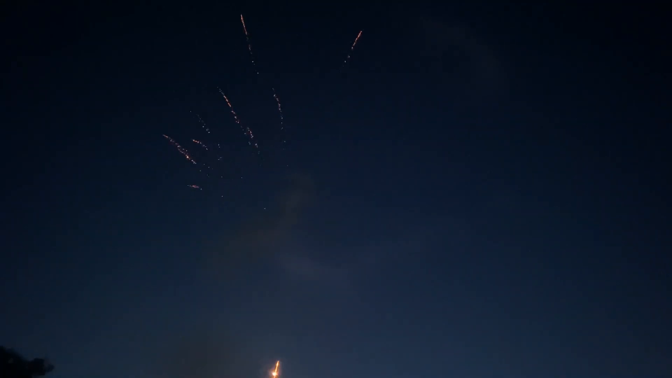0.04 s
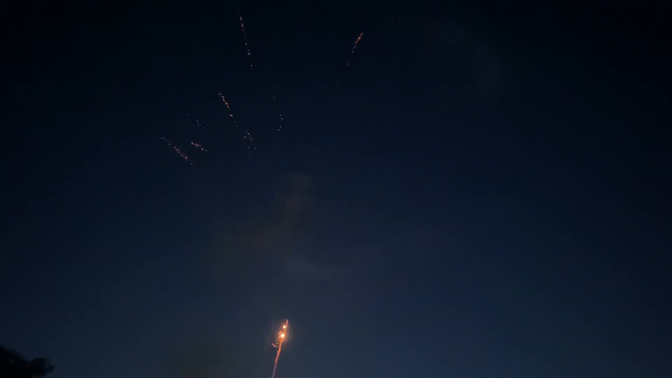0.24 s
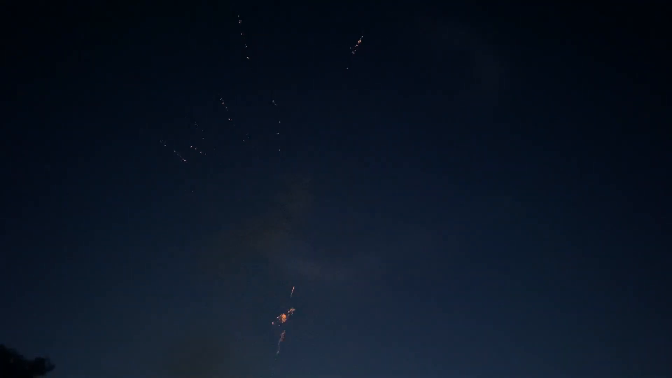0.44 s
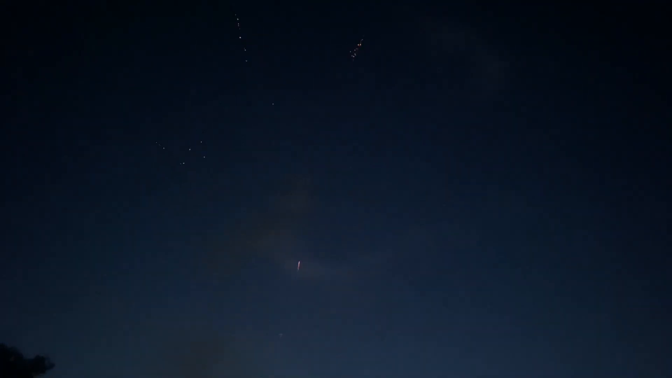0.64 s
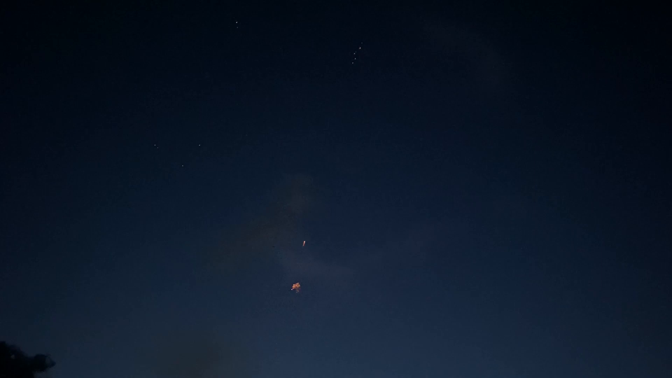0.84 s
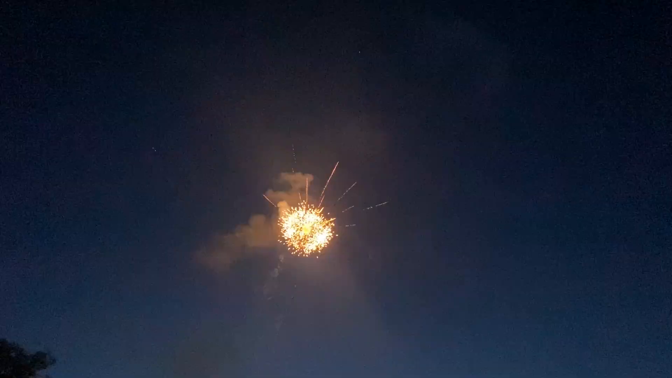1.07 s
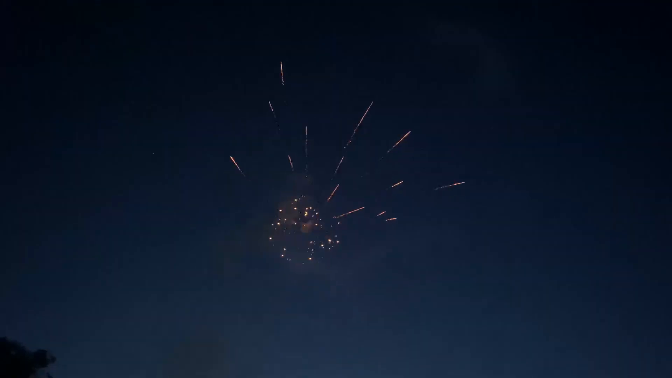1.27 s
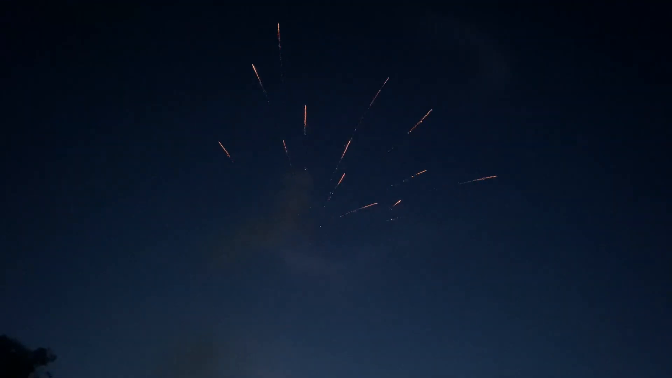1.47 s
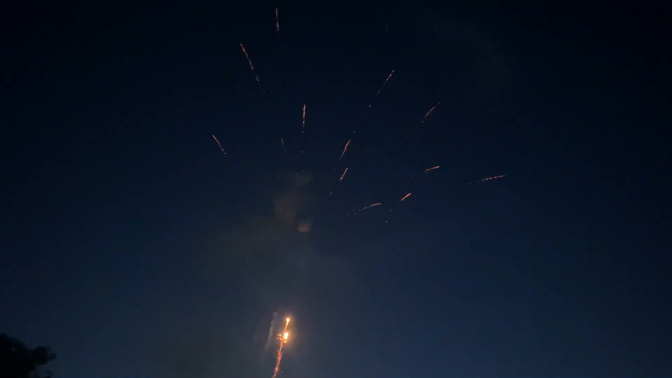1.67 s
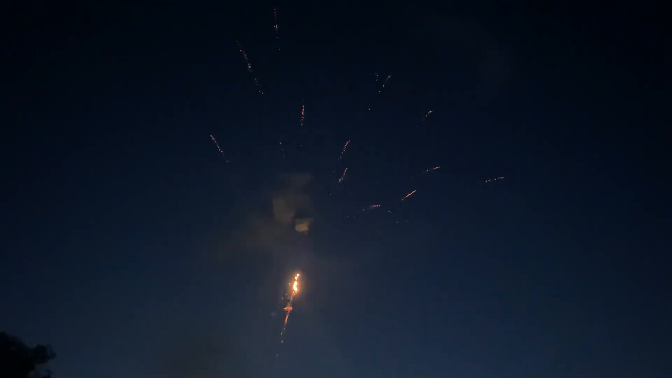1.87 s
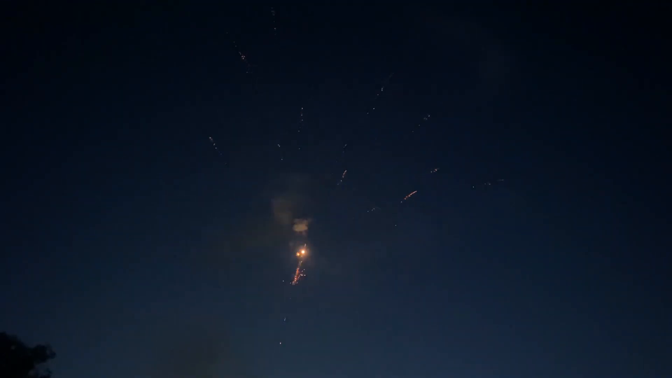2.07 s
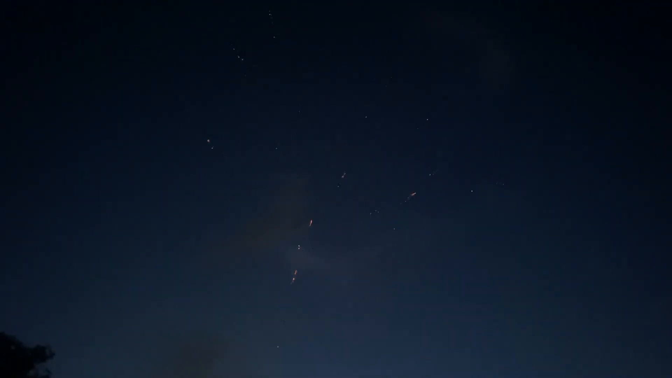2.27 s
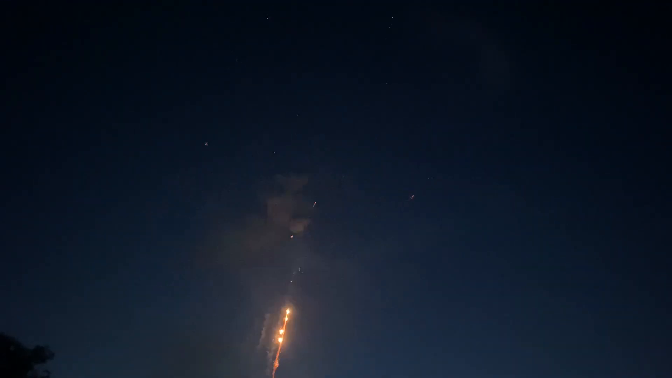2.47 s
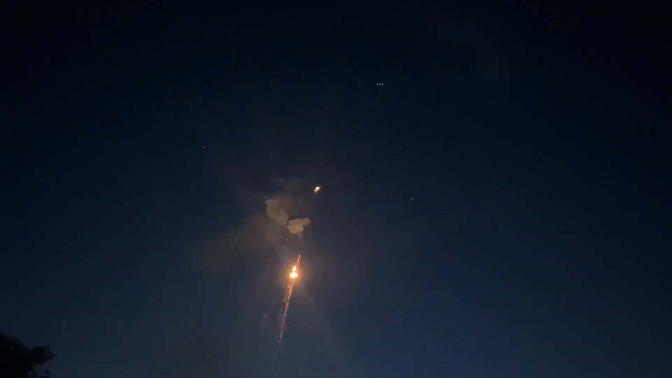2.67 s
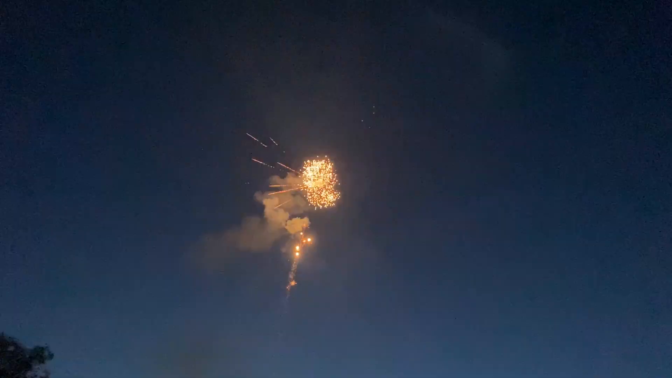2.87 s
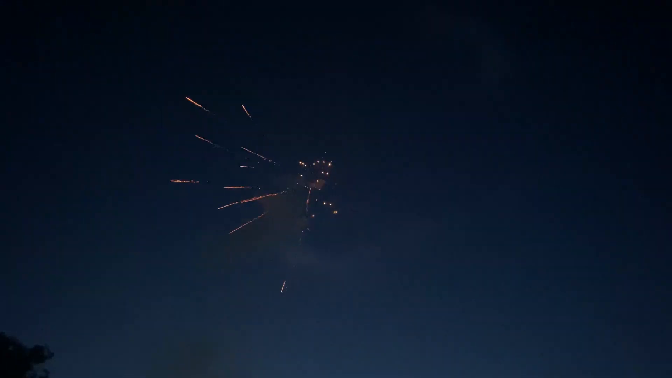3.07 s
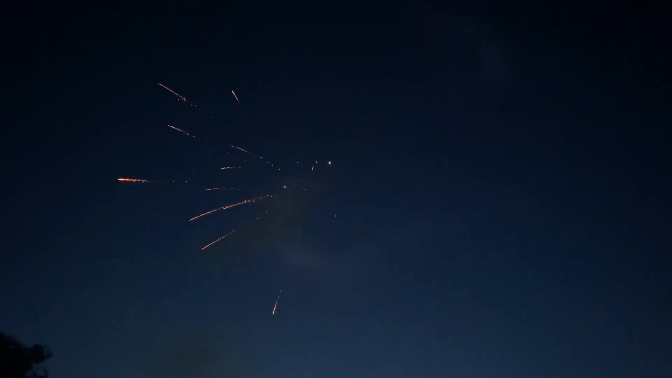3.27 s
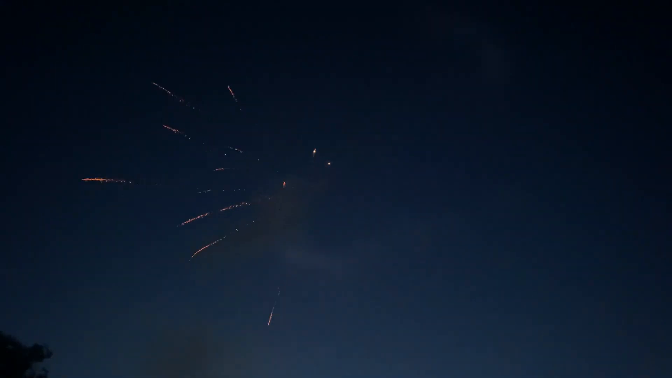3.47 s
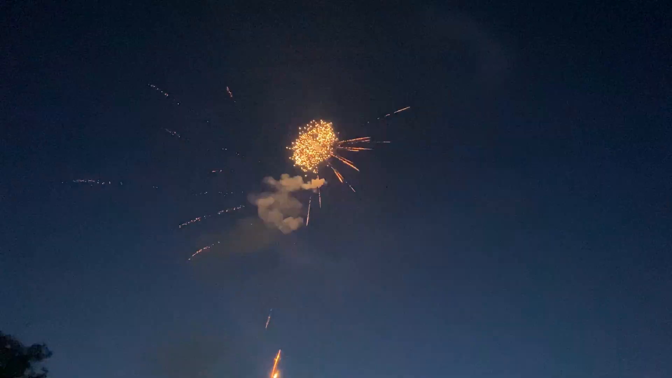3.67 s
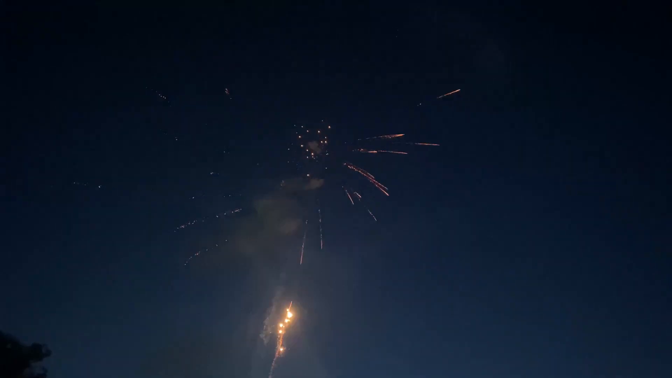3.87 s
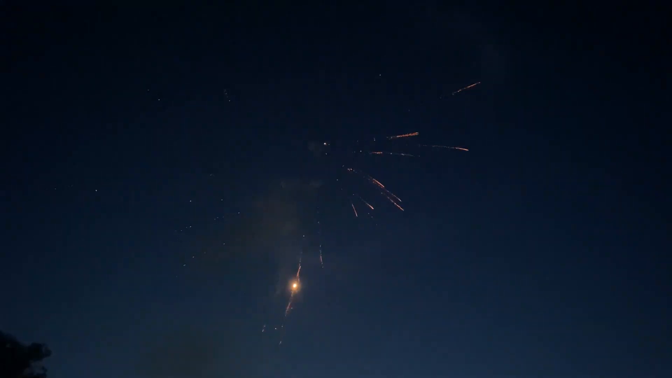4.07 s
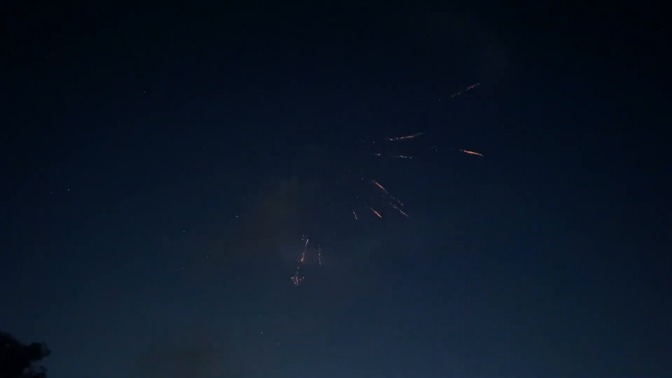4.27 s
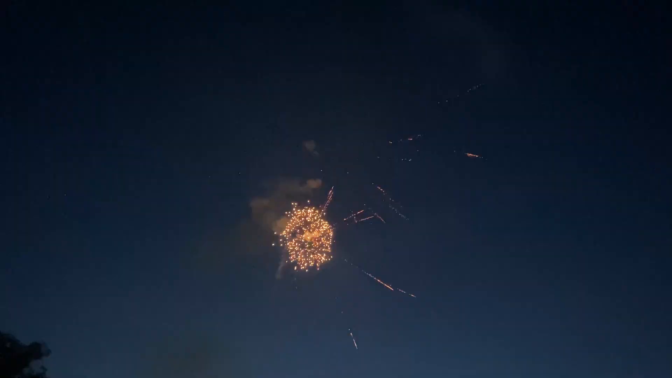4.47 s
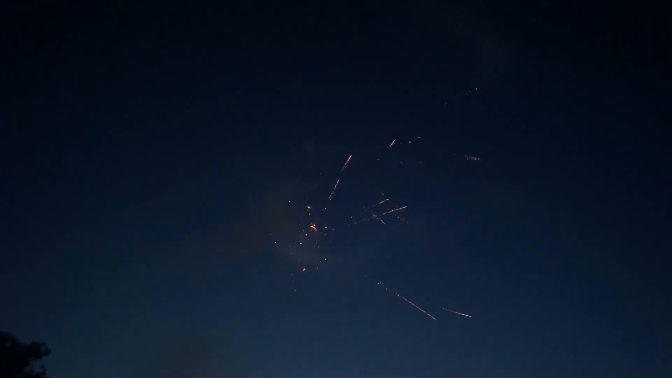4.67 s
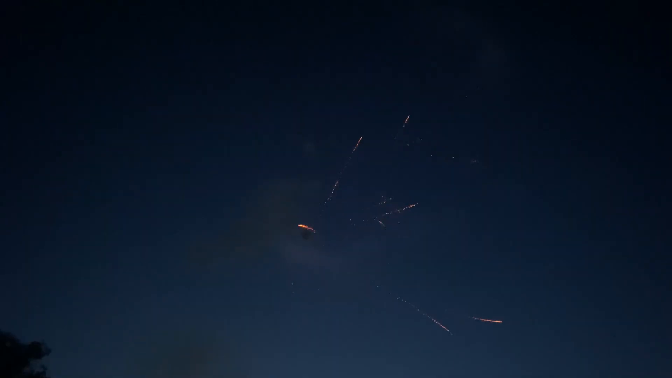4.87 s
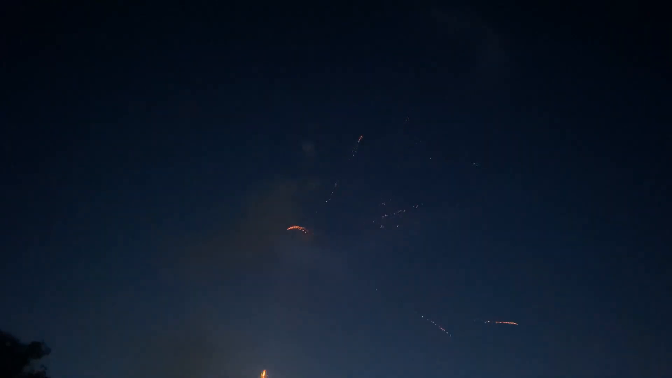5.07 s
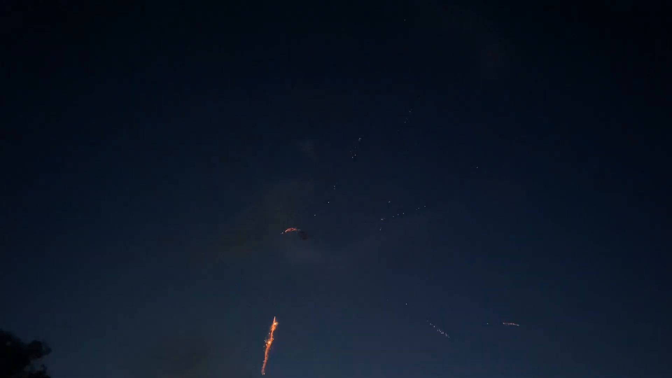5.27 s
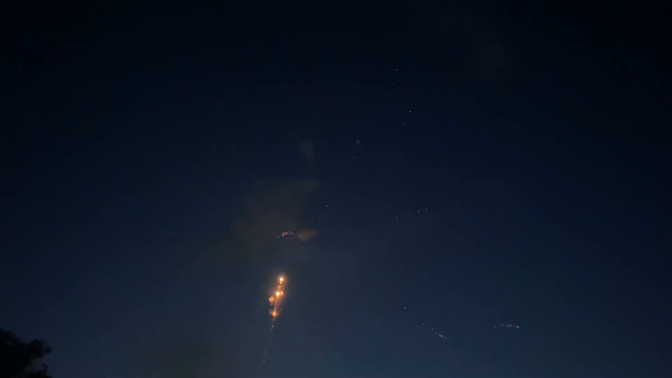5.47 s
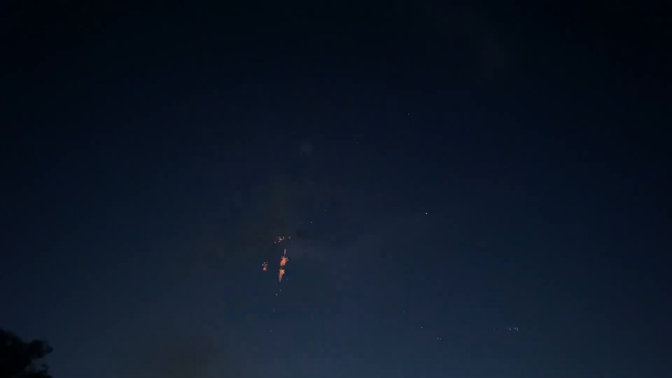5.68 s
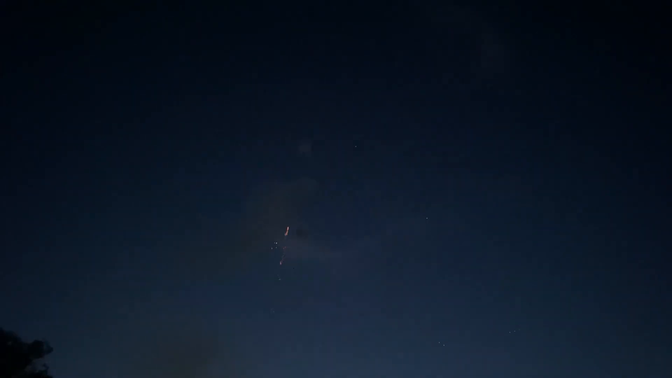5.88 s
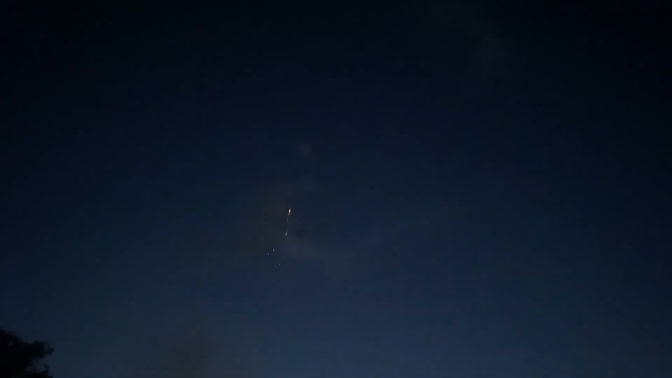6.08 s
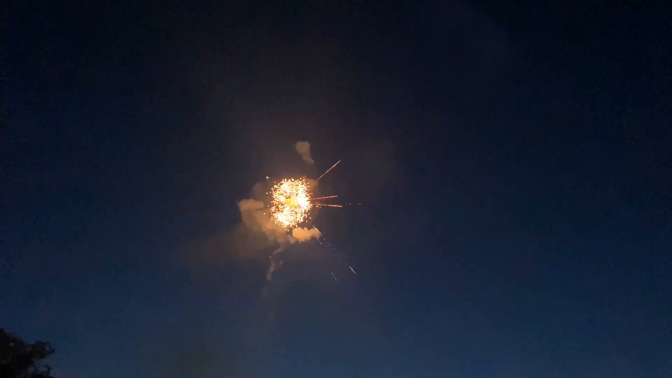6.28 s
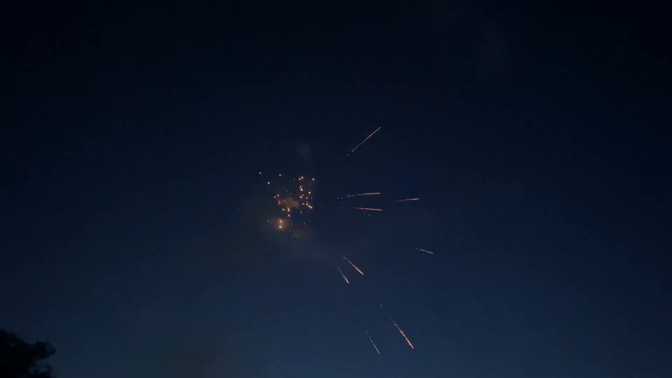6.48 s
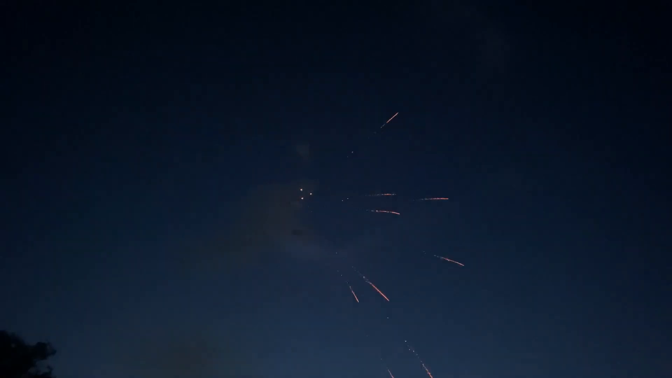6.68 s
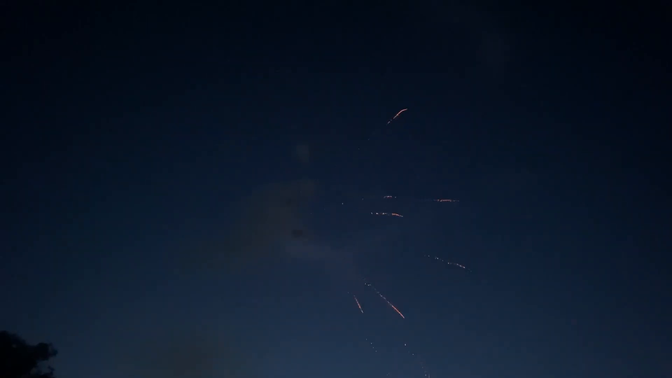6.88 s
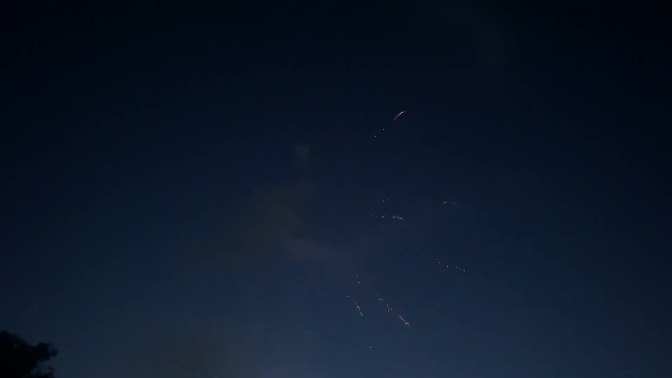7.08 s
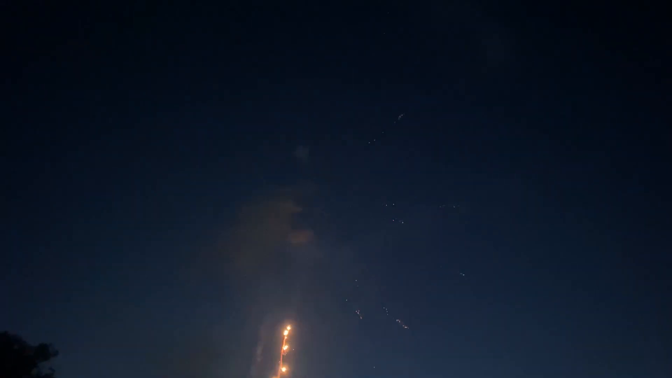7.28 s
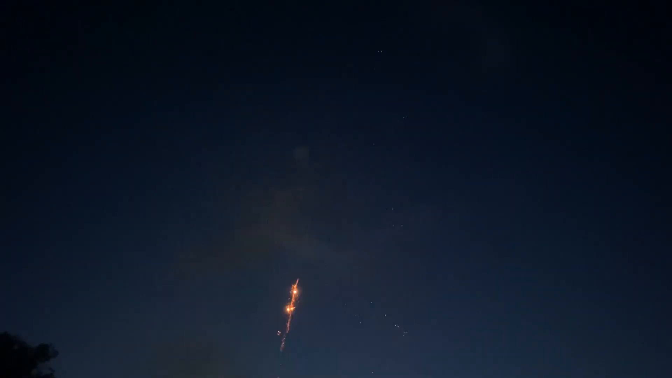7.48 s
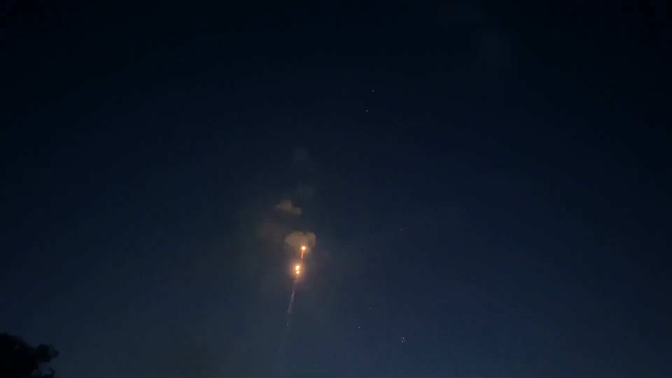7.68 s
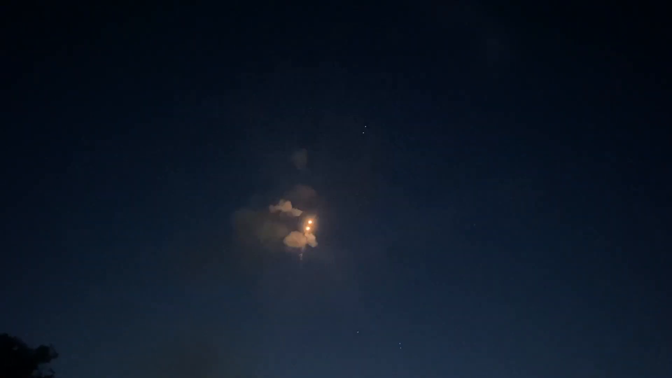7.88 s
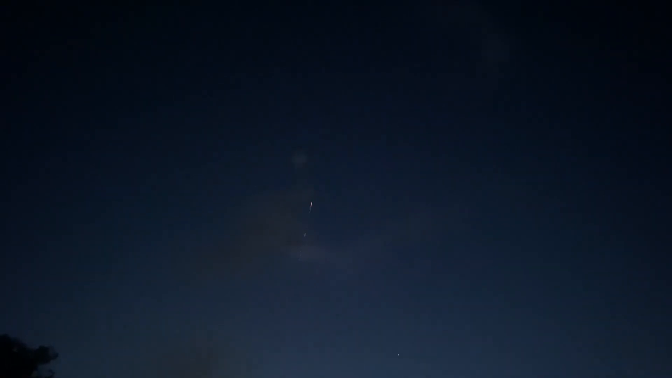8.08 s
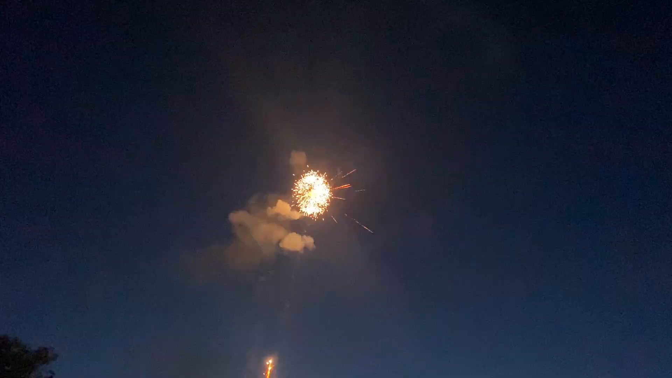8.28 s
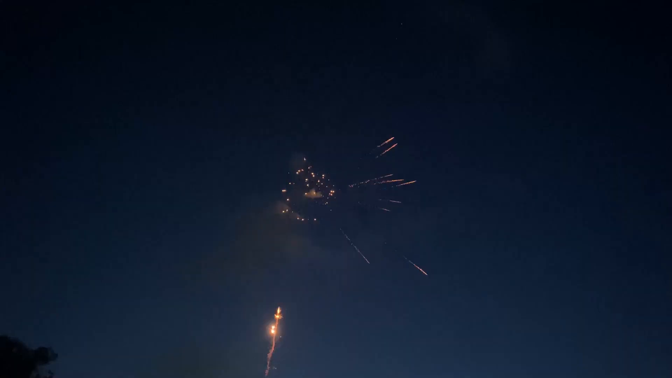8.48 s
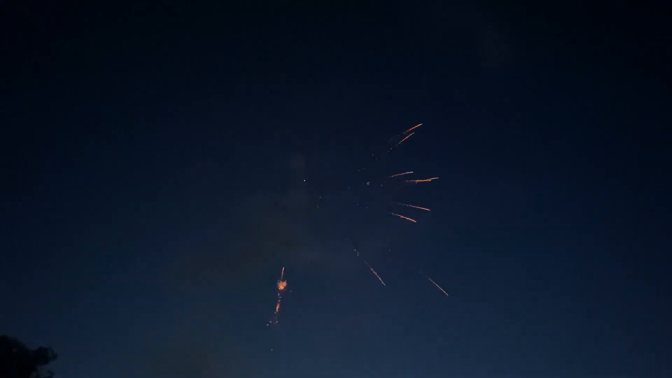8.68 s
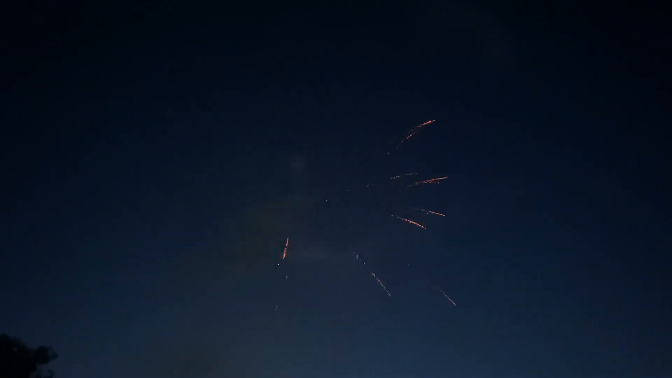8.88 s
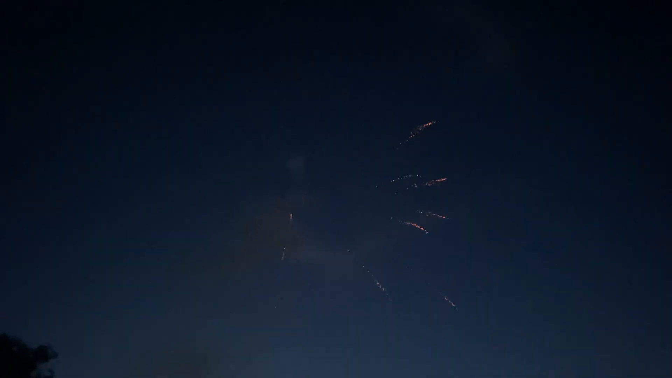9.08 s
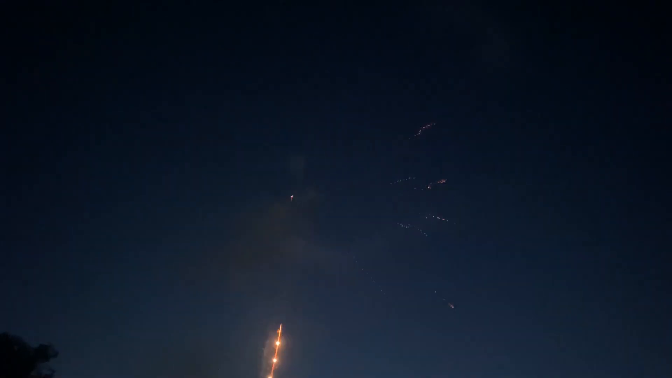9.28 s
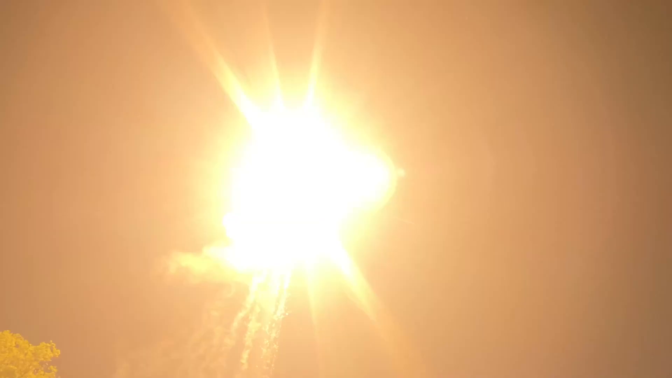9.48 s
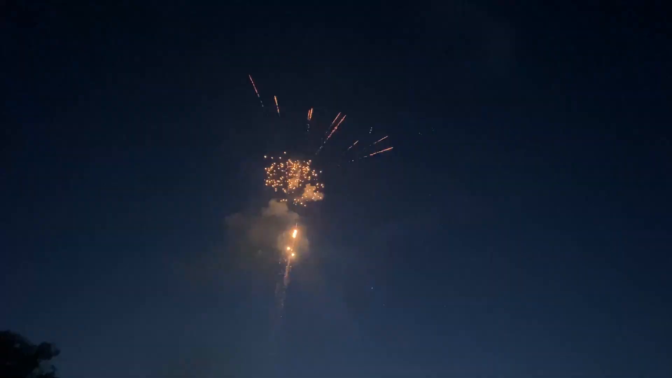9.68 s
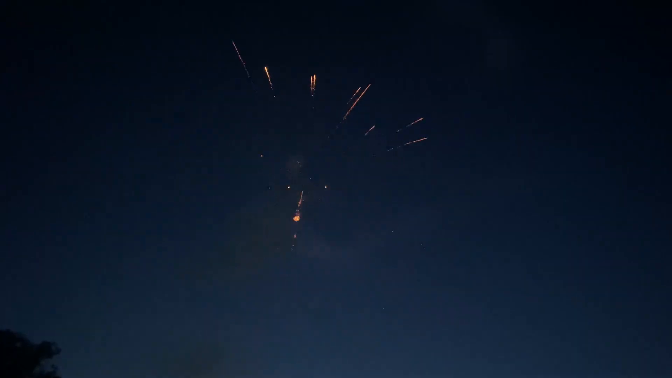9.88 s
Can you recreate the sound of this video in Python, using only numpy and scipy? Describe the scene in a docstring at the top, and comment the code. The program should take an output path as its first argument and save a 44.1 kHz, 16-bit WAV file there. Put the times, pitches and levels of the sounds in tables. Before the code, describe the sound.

A firework cake goes off in open ground at dusk, heard on a small stereo recorder. It opens on the fading rumble and crackle of an earlier shell, with scattered snaps to 1.1 s. A launch thump at 1.2 s is followed at once by a big, deep bang at 1.27. Crackle swells around 2.0 after another thump at 2.1, and again near 2.9. Heavy bursts come at 3.1, 3.9 and 4.6, with a thump at 3.3, crackle around 4.1 and faint thumps at 4.8 and 5.0. Bright crackle peaks near 5.4, and sparse snaps lead to a bang at 6.5. A thump at 6.9, crackle around 7.7, a weaker thump at 7.9 and thick snapping lead to the burst at 8.5. A thump at 8.9 and more crackle precede the last bang at 9.8. Each report has a fast ground slap and a wide, rumbling echo that fades into near silence.

```python
"""Open ground at dusk, a firework cake going off. Lift charges thump in the tubes, shells burst overhead
and clouds of stars crackle. Reports are N-shaped pressure waves with a noisy crack, doubled by the ground;
stars are clusters of filtered clicks. Banded stereo noise rolls back from trees and houses, joins the
crackle's lingering hiss and holds the evening hush.
A small two-port recorder smears bass behind treble and rounds the peaks."""
import sys
import numpy as np
from scipy import signal
from scipy.fft import rfft, irfft, next_fast_len
from scipy.io import wavfile

SR = 44100
rng = np.random.default_rng(int(sys.argv[2]) if len(sys.argv) > 2 else 0)


def dump(signal):
    """Clip the signal to [-1, 1] and save it as 16-bit WAV at the path in sys.argv[1]."""
    limited = np.clip(np.atleast_2d(signal).T, -1, 1)
    pcm = np.round(limited * 32767).astype(np.int16)
    wavfile.write(sys.argv[1], SR, pcm)


N = 438337      # length in samples
STEP = 128      # samples between points of the slow level curves


def amp(db):
    """Turn dB into gain."""
    return 10 ** (np.asarray(db) / 20)


def rms_one(x):
    """Scale to unit power."""
    return x / np.sqrt(np.mean(x ** 2) + 1e-20)


def at_hz(points, hz):
    """Read a tone table on a log-frequency axis."""
    points = np.array(points)
    return np.interp(np.log(hz), np.log(points[:, 0]), points[:, 1])


def colour(x, left, right):
    """Make two channels, each shaped by its own gain over frequency."""
    size = next_fast_len(N + SR // 4)
    hz = np.maximum(np.arange(size // 2 + 1) * SR / size, 1.0)
    gains = np.array([left(hz), right(hz)])
    return irfft(rfft(x, size) * gains, size)[:, :N]


def causal(points):
    """Turn a tone table into a minimum-phase filter of unit power, by folding its cepstrum."""
    hz = np.maximum(np.arange(1025) * SR / 2048, 1.0)
    cepstrum = irfft(np.log(amp(at_hz(points, hz))))
    cepstrum[1:1024] *= 2
    taps = irfft(np.exp(rfft(cepstrum[:1025], 2048)))[:600]
    return taps / np.sqrt(np.sum(taps ** 2))


PUSH_HZ, PUSH_T60_S = 75, 0.12      # slow heave of air behind the front


def report(zero_ms, rise_hz, crack_db, push_db, echo_ms, echo_db, echo_hz):
    """An N-shaped pressure wave with a ragged crack on its front, its copy off the ground and a deep heave."""
    t_ms = np.arange(6000) / SR * 1e3
    thump = (t_ms / zero_ms - 1) * np.exp(-2.8 * t_ms / zero_ms)      # crosses zero at zero_ms
    thump = signal.lfilter(*signal.butter(1, rise_hz, fs=SR), thump)
    thump = signal.lfilter(*signal.butter(2, 140, "high", fs=SR), thump)      # the front holds little deep bass

    crack = signal.lfilter([.35], [1, -.86], rng.standard_normal(len(t_ms))) * np.exp(-t_ms / 1.35)
    # the very front is brighter
    crack = crack + 0.17 * rng.standard_normal(len(t_ms)) * np.exp(-t_ms / 0.35)
    crack = signal.lfilter(*signal.butter(1, 600, "high", fs=SR), crack)
    front = thump + amp(crack_db) * crack

    bounced = signal.lfilter(*signal.butter(1, echo_hz, fs=SR), front)
    lag = int(echo_ms * SR / 1e3)
    ground_echo = amp(echo_db) * np.concatenate([np.zeros(lag), bounced[:-lag]])

    t_s = t_ms / 1e3
    push = amp(push_db - 60 * t_s / PUSH_T60_S) * np.sin(2 * np.pi * PUSH_HZ * t_s)
    return front + ground_echo + push


# Tilt between the two ports. Each row: frequency in Hz, left level minus right level in dB.
PORT_TILT = [(60, -1.5), (150, -4), (380, -3), (950, -4.5), (2380, -1.5), (5980, 2.5), (15000, 0.5)]


def reports(table, zero_ms, rise_hz, crack_db, push_db, echo_db, echo_hz, boost_db, left_db, left_lag):
    """Direct sound of a table of reports; the left port hears it shaded and left_lag samples apart."""
    out = np.zeros(N + 6000)
    for start_s, level_db, echo_ms, _ in table:
        wave = report(zero_ms, rise_hz, crack_db, push_db, echo_ms, echo_db, echo_hz)
        out[round(start_s * SR):][:len(wave)] += amp(level_db + boost_db) * wave

    def left(hz):
        shade = amp(left_db * hz / (hz + 150))      # deepens with pitch
        delay = np.exp(-2j * np.pi * hz * left_lag / SR)      # a negative lag comes early
        return shade * delay * amp(at_hz(PORT_TILT, hz) / 2)

    return colour(out[:N], left, lambda hz: amp(-at_hz(PORT_TILT, hz) / 2))


# Shells bursting. Each row: start in seconds, direct level in dB before the boost,
# delay of the ground echo in ms, reference level of the rolling echo in dB.
BURSTS = [(1.2690, -3, 7.7, -30), (3.0837, -3, 8.0, -30), (3.8618, -3, 7.9, -30), (4.6076, -3, 7.7, -30),
          (6.4903, -3, 7.9, -29.5), (8.5107, -3, 7.95, -29.5), (9.7824, -3, 7.9, -30.5)]


def shell_bursts():
    """Shells breaking overhead: a long pressure wave under a soft crack."""
    return reports(BURSTS, zero_ms=3.6, rise_hz=407, crack_db=-12.0, push_db=-18.5, echo_db=0.3,
                   echo_hz=3850, boost_db=12.0, left_db=-7.5, left_lag=-1.18)


# Lift charges. Each row: start in seconds, direct level in dB before the boost,
# delay of the ground echo in ms, reference level of the rolling echo in dB.
LIFTS = [(1.2192, -15, 8.4, -43), (2.1008, -12.5, 8.4, -46), (3.2968, -15, 8.4, -43),
         (4.758, -23, 8.3, -48), (5.008, -36, 8.4, -49), (6.8758, -17, 8.4, -45.5), (7.9452, -19, 8.2, -51),
         (8.9375, -16, 8.4, -45)]


def lift_charges():
    """Charges thumping in the tubes: a short pressure wave with a strong crack and a dull ground echo."""
    return reports(LIFTS, zero_ms=1.5, rise_hz=1700, crack_db=-3.5, push_db=-17.0, echo_db=0.0,
                   echo_hz=1000, boost_db=5.0, left_db=-1.5, left_lag=-7.5)


# Clouds of small stars; most set in a third to half a second after a lift.
# Each row: start in seconds, swell in seconds, fade in seconds, fullest level in dB.
CLOUDS = [(-.3, .6, .5, -43.5), (1.52, .48, .4, -40), (2.55, .35, .45, -40), (3.68, .45, .38, -39),
          (5.12, .26, .58, -38), (7.22, .45, .5, -41), (8.35, .52, .26, -39), (9.3, .32, .7, -43)]
CLOUD_EDGE_DB = -15      # start and end of a cloud, relative to its fullest


def clouds(t):
    """Crackle level in dB: every cloud swells and fades along an arch in dB, then stops."""
    power = 1e-12
    for start, swell, fade, full_db in CLOUDS:
        top = start + swell
        off = np.where(t < top, (top - t) / swell, (t - top) / fade)      # 0 at the top, 1 at the edges
        power = power + amp(2 * (full_db + CLOUD_EDGE_DB * off ** 1.3)) * (off < 1)
    return 10 * np.log10(power)


# Single stars set one by one, from loud cracks to faint ticks in the lulls.
# Each row: start in seconds, level in dB before the click gain.
STARS = [(0.0962, -20.5), (0.1441, -20), (0.2014, -21.5), (0.2099, -19.5), (0.2443, -50), (0.3032, -58),
         (0.3835, -42), (0.4439, -28), (0.4768, -20), (0.5112, -23), (0.5387, -21.5), (0.5741, -16.5),
         (0.604, -19), (0.6245, -23), (0.6684, -23), (0.7457, -31), (0.7751, -34), (0.8026, -26),
         (1.0745, -25.5), (1.6067, -22), (1.6287, -23), (1.6684, -24), (1.7843, -25), (1.7978, -21),
         (1.8532, -20), (1.9754, -19), (2.138, -18), (2.2634, -24), (2.3176, -18.5), (2.359, -31),
         (2.4179, -30), (2.4857, -33), (2.5067, -22.5), (2.5521, -46), (2.574, -29), (2.6005, -26.5),
         (2.6399, -21), (2.6754, -21.5), (2.7137, -23), (2.7472, -22.5), (2.9213, -28), (2.9976, -36),
         (3.0134, -19), (3.464, -24.5), (3.5992, -32.5), (3.6805, -28), (3.7165, -28), (3.7349, -23),
         (3.7738, -22), (3.8122, -18.5), (4.1545, -26), (4.2198, -30), (4.2814, -46), (4.3505, -33),
         (4.4084, -35), (4.4448, -26.5), (4.4947, -25), (4.5276, -32), (5.1741, -33), (5.1816, -19.5),
         (5.4944, -38), (5.5608, -43), (5.6336, -19), (5.6944, -33), (5.7614, -23.5), (5.7982, -34),
         (5.8471, -23), (5.887, -20.5), (5.9085, -22), (5.9429, -29), (6.0282, -40.5), (6.1005, -32),
         (7.1975, -29), (7.209, -29.5), (7.228, -33), (7.3372, -19.5), (7.4086, -20), (7.4344, -27),
         (7.4889, -21), (7.5383, -15.5), (7.643, -22), (7.669, -17), (7.7014, -18), (7.8101, -34),
         (7.8276, -34), (7.883, -21.5), (7.9149, -22.5), (8.0311, -21.5), (8.0651, -27), (8.1045, -25),
         (8.1673, -24.5), (8.2846, -31.5), (8.321, -26), (8.3584, -26), (8.3779, -20.5), (8.4277, -26),
         (8.4534, -21.5), (8.4761, -15), (8.8059, -43), (8.8767, -40), (8.9855, -30), (9.0204, -22.5),
         (9.0483, -36), (9.0738, -42), (9.1366, -30.5), (9.2449, -28.5), (9.3382, -26), (9.3591, -22.5),
         (9.3836, -25), (9.4115, -21.5), (9.4574, -27), (9.4709, -17), (9.4938, -22), (9.5274, -21),
         (9.5672, -20), (9.6515, -40)]
# Tone of a snap. Each row: frequency in Hz, relative level in dB.
STAR_TONE = [(180, -64), (300, -15), (649, -10.5), (1100, -5.5), (1660, -4), (2240, -1), (2570, -10.5),
             (5100, -6.5), (9330, -17.5), (11200, -12), (13300, -25.5), (15200, -18), (16500, -49)]
SNAPS_PER_S, CLOUD_FULL_DB = 260, -43.5      # mean rate of cloud snaps, and the cloud level that gives it
SINGLE_GAIN_DB = 9.5      # click height of a single star over the table level
SINGLE_LEAN, CLOUD_LEAN = -0.95, -2      # mean lean of single and cloud stars, positive favours the left


def stars(snap_db):
    """Single and clustered snaps, each with its own lean, ragged, with a ground echo and a short scatter."""
    sizes = amp(3.0 * np.minimum(rng.exponential(1, N), 3.5))
    flurries = np.repeat(rng.gamma(3, 1 / 3, N // 500 + 1), 500)[:N]      # stars go off in flurries
    rate = SNAPS_PER_S * amp(snap_db - CLOUD_FULL_DB)      # a fuller cloud snaps more often
    born = np.flatnonzero(rng.random(N) < rate * flurries / SR)
    # density is divided out so the cloud keeps its level
    density = np.mean(sizes ** 2) * rate[born] / SR
    cloud_size = sizes[born] / np.sqrt(density) * amp(snap_db[born])

    single_s, single_db = np.transpose(STARS)
    at = np.concatenate([born, (single_s * SR).astype(int)])
    size = np.concatenate([cloud_size, amp(single_db + SINGLE_GAIN_DB)])
    in_cloud = np.arange(len(at)) < len(born)
    lean = rng.normal(0, 2.91, N)[at] + np.where(in_cloud, CLOUD_LEAN, SINGLE_LEAN)
    right_lag = np.round(rng.normal(9.7, 1.0, N)[at])      # samples
    echo_lag = (rng.uniform(0.0058, .0095, N)[at] * SR).astype(int)

    clicks = np.zeros((2, N + SR))
    for share in (.9, .35, .3, .25):      # one crack and a few splinters within 1.5 ms
        late = rng.uniform(0, 0.0015 * SR, N)[at]
        turned = rng.choice([-1, 1], N)[at]
        # lean moves the left far more than the right
        for side, (weight, lag) in enumerate([(4, 0), (-0.5, right_lag)]):
            when = (at + lag + late).astype(int)
            height = share * turned * size * amp(weight * lean / 2)
            np.add.at(clicks[side], when, height)
            np.add.at(clicks[side], when + echo_lag, height * amp(-7.5))

    # nearby bushes and walls
    scatter = amp(-31 - 60 * np.arange(4000) / SR / .08) * rng.standard_normal((2, 4000))
    scatter = signal.lfilter([.6], [1, -.6], scatter)      # leaves swallow the treble
    scatter[:, 0] = 1      # the direct sound
    scattered = signal.oaconvolve(clicks[:, :N], scatter, axes=1)
    return signal.oaconvolve(scattered, causal(STAR_TONE)[None])[:, :N]


BLEND_T60_S, SINGLE_BLEND_DB = .7, -23      # decay of the hiss; share of a single star that joins it


def lingering(level_db):
    """Level in dB of the star cloud and the single stars, held on by a dying echo."""
    hold = amp(-120 * STEP / SR / BLEND_T60_S)      # power kept per step
    power = amp(2 * level_db)
    single_s, single_db = np.transpose(STARS)
    joining = amp(2 * (single_db + SINGLE_BLEND_DB)) / (1 - hold)
    np.add.at(power, (single_s * SR / STEP).astype(int), joining)
    held = signal.lfilter([1 - hold], [1, -hold], power, zi=[power[0]])[0]
    return 10 * np.log10(held)


# Groups of echoes after a report, from near ground, trees and far houses.
# Each row: arrival in seconds, rise in seconds, relative level in dB of deep bass, low mids and treble,
# 60 dB decay time in seconds of deep bass, low mids and treble.
ECHOES = [(0, .003, -23, 19.5, 4, .2, .15, .14), (.01, .03, -3, -2, -8, 2.1, 2.3, 1.0),
          (.12, .06, -6, -12, -4, .4, 1.5, 1.3)]
# Pitches of those three parts: deep bass in Hz, low mids in Hz, treble in Hz.
ECHO_HZ = [54, 278, 3800]


def rolling(delay, hz):
    """Power of all echo groups at one pitch, a delay in seconds after a report: each rises, then decays."""
    power = 0
    for arrival, rise, *by_pitch in ECHOES:
        levels, decays = np.reshape(by_pitch, (2, 3))
        level_db = at_hz(list(zip(ECHO_HZ, levels)), hz)
        t60 = at_hz(list(zip(ECHO_HZ, decays)), hz)
        since = np.maximum(delay - arrival, 0) + 1e-9 * (delay > arrival)
        power = power + np.minimum(since / rise, 1) ** 2 * amp(2 * (level_db - 60 * since / t60))
    return power


def lumps(count, rate_hz):
    """Slow random drift of unit spread, one value per step: noise through two equal low-pass poles."""
    r = np.exp(-2 * STEP * np.pi * rate_hz / SR)
    return rms_one(signal.lfilter([1], [1, -2 * r, r * r], rng.standard_normal(count + 200))[200:])


# A burst that still rolls at the start. Each row: start in seconds, reference level of the rolling echo in dB.
EARLIER = [(-0.032, -42)]
# Tone of the rolling echoes. Each row: frequency in Hz, relative level per Hz in dB.
ROLL_TONE = [(15, -34), (25, -23), (48, -5.5), (97, -2.5), (354, -7), (427, -18.5), (624, -8),
             (1370, -13.5), (2350, -14), (6500, -25.5), (10700, -32), (16000, -33.5)]
# Tone of the lingering hiss. Each row: frequency in Hz, relative level per Hz in dB.
BLEND_TONE = [(180, -6), (300, -7.5), (842, -8), (2480, -4), (2700, -7.5), (6300, -7.5), (8220, -25),
              (11300, -36), (16000, -45)]
# Tone of the evening hush. Each row: frequency in Hz, relative level per Hz in dB.
EVENING_TONE = [(15, -32), (25, -0.5), (324, -10), (357, 1), (425, -40), (543, -9.5), (786, -21.5),
                (2270, -27), (9000, -43), (11700, -106.5), (19800, -120)]
EVENING_DB = -60
# Width of the far field. Each row: frequency in Hz, likeness of left and right from -1 to 1.
LIKENESS = [(60, 0.7), (180, 1), (550, 0.025), (1650, 0.05), (4970, -0.2), (15000, 0.64)]


def far_field(blend_db):
    """Half-octave bands of stereo noise: rolling echoes, the blend of the star cloud and the evening hush."""
    t = np.arange(0, N + STEP, STEP) / SR
    edges = 24 * 2 ** np.arange(0, 9.6, .5)
    centre = np.sqrt(edges[1:] * edges[:-1])

    def level(tone, hz):
        """Tone level at a pitch, evened so that the bands together hold a set power."""
        total = np.sum(amp(2 * at_hz(tone, centre)) * np.diff(edges)) / (SR / 2)
        return at_hz(tone, hz) - 10 * np.log10(total)

    white = rng.standard_normal((2, 2, N))
    together = lumps(len(t), rate_hz=48.0)      # shared by all bands
    out = 0
    for k, hz in enumerate(centre):
        roll_db = level(ROLL_TONE, hz)
        power = sum(amp(2 * (db + roll_db)) * rolling(t - start_s, hz)
                    for start_s, *_, db in EARLIER + BURSTS + LIFTS)
        # echoes arrive unevenly
        power = power * amp(2 * (1.27 * together + 1.2 * lumps(len(t), rate_hz=41)))
        power = power + amp(2 * (blend_db + level(BLEND_TONE, hz)))
        power = power + amp(2 * (EVENING_DB + level(EVENING_TONE, hz)))

        band = signal.butter(2, edges[k:k + 2], "band", fs=SR, output="sos")
        mid, side = signal.sosfilt(band, white[k % 2])      # neighbours take different noise
        alike = np.clip(at_hz(LIKENESS, hz), -1, 1)
        stereo = np.sqrt(1 + alike) * mid + np.sqrt(1 - alike) * side * [[1], [-1]]
        tilt = amp(at_hz(PORT_TILT, hz) / 2 * np.array([[1], [-1]]))
        out = out + np.interp(np.arange(N) / SR, t, np.sqrt(power)) * tilt * stereo
    return out


# Far sound meeting its own ground echo. The one row: first peak in Hz, spacing in Hz, depth from 0 to 1,
# pitch in Hz where the depth has halved.
GROUND_COMB = (15.7, 282.4, 0.21, 1500)


def over_ground(x):
    """Peaks and notches where far sound adds to its ground echo, and the treble lost on the way."""
    first_hz, step_hz, depth, fade_hz = GROUND_COMB

    def path(hz):
        ripple = np.cos(2 * np.pi * (hz - first_hz) / step_hz)
        comb = 1 + depth / (1 + (hz / fade_hz) ** 2) * ripple
        return comb / np.sqrt(1 + (hz / 11000) ** 6)      # the long path eats the top

    return colour(x, path, path)


def scene():
    """Layer bursts, lifts and stars over the far field."""
    bursts = shell_bursts()
    lifts = lift_charges()
    snaps = stars(clouds(np.arange(N) / SR))
    hiss_db = lingering(clouds(np.arange(0, N + STEP, STEP) / SR)) - 6      # sits 6 dB under the held level
    far = far_field(hiss_db)
    return bursts + lifts + snaps + over_ground(far)


def smear(x, top_hz, bottom_hz):
    """A chain of all-pass stages spread in log pitch: the lower the sound, the later it comes out."""
    warp = np.tan(np.pi * np.geomspace(top_hz, bottom_hz, 6) / SR)
    poles = (1 - warp) / (1 + warp)
    return signal.sosfilt([[-p, 1, 0, 1, -p, 0] for p in poles], x)


def record(dry):
    """The recorder cuts and smears the bass, rounds the peaks with a tanh curve and cuts the top."""
    x = signal.sosfilt(signal.butter(3, 42, "high", fs=SR, output="sos"), dry)
    x = smear(x, top_hz=506, bottom_hz=106)
    rounded = 1.04 * np.tanh(x / 0.81)
    return signal.sosfilt(signal.cheby2(12, 70, 17150, fs=SR, output="sos"), rounded)


dry = scene()
out = record(dry)
dump(out)
```